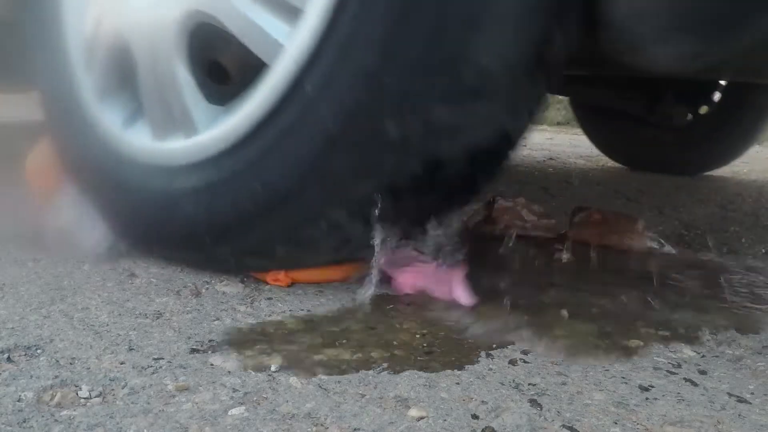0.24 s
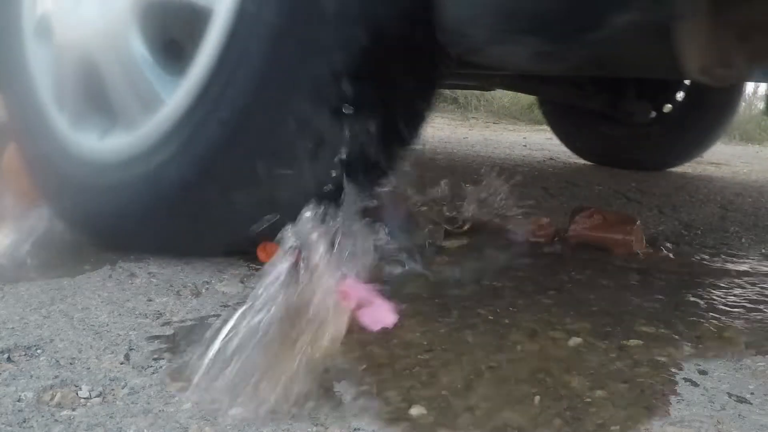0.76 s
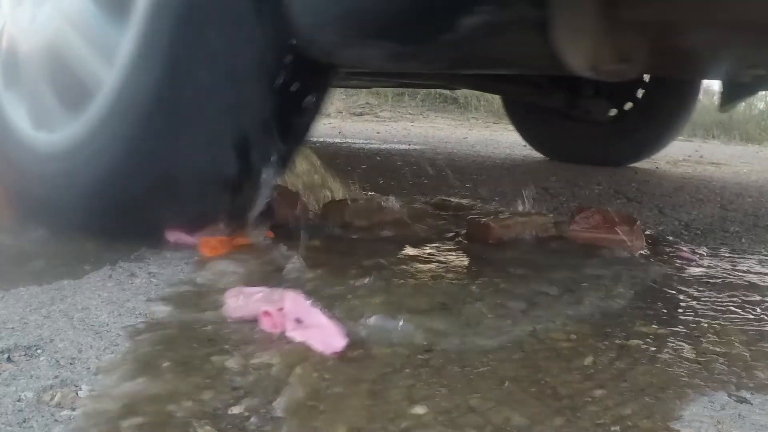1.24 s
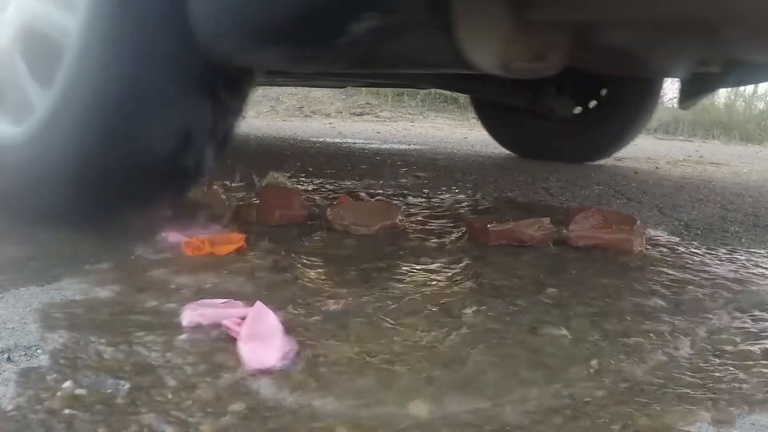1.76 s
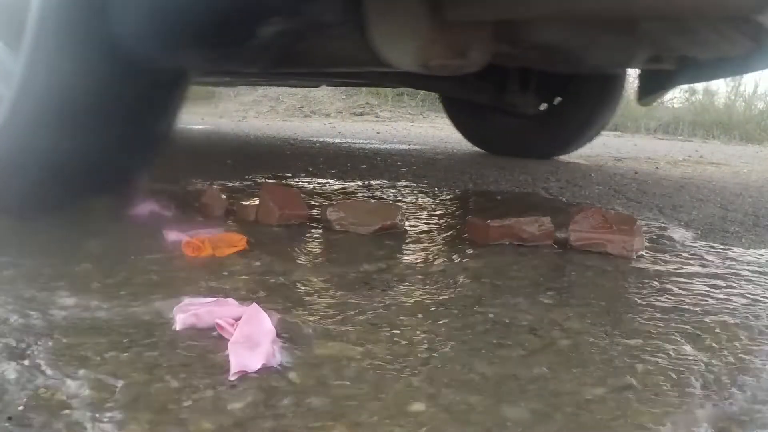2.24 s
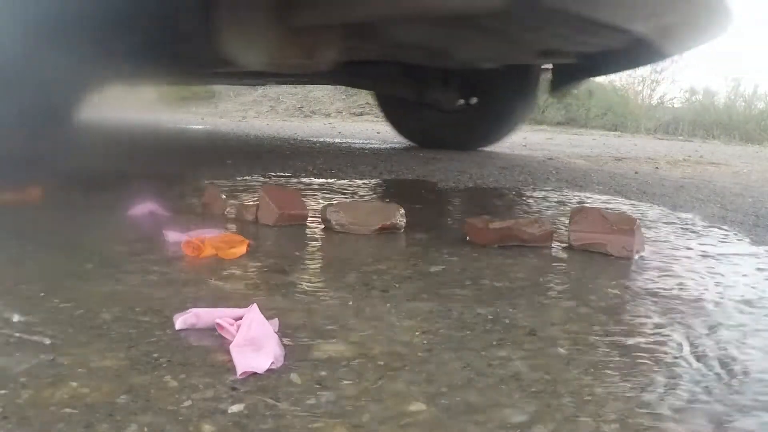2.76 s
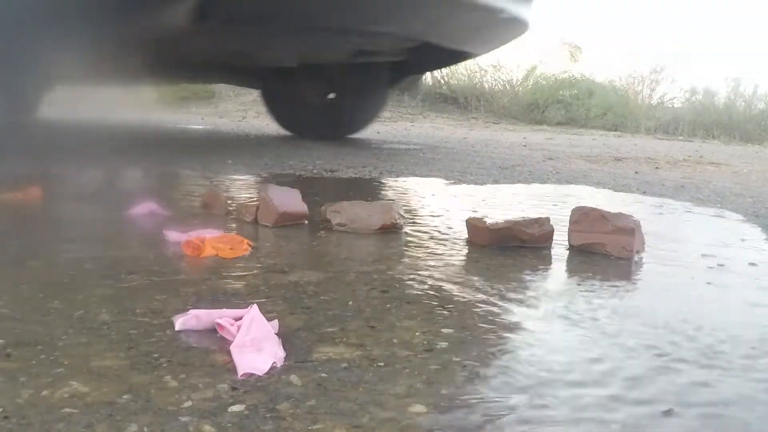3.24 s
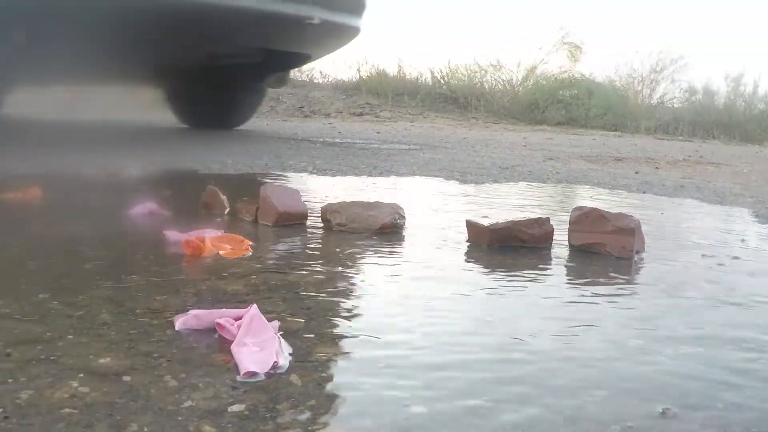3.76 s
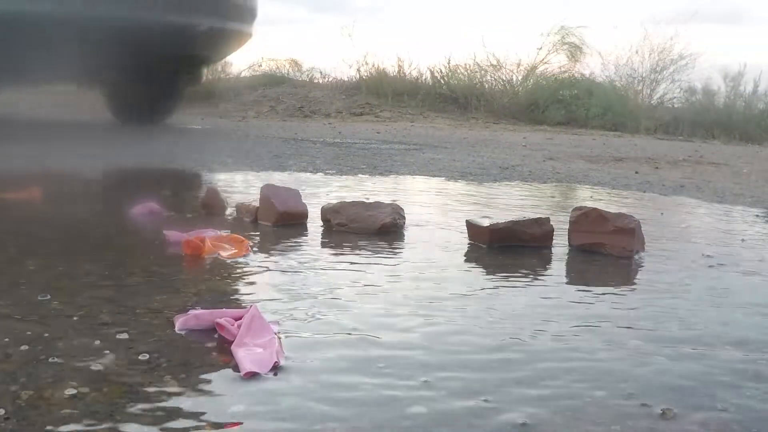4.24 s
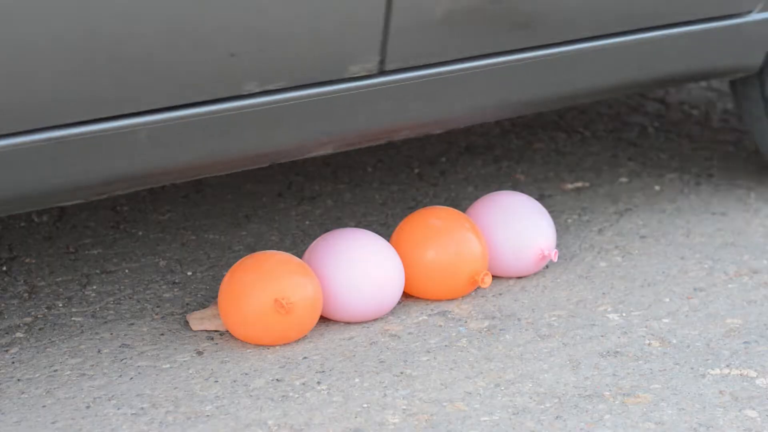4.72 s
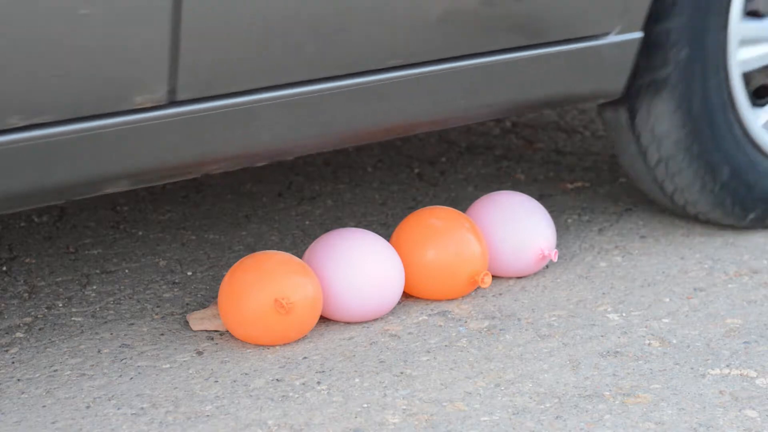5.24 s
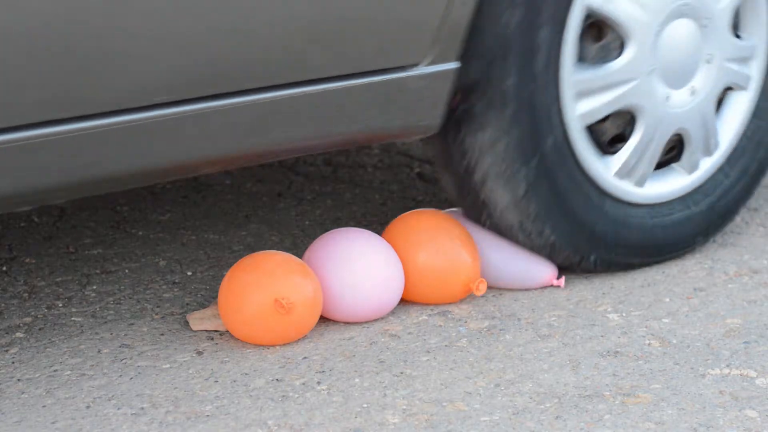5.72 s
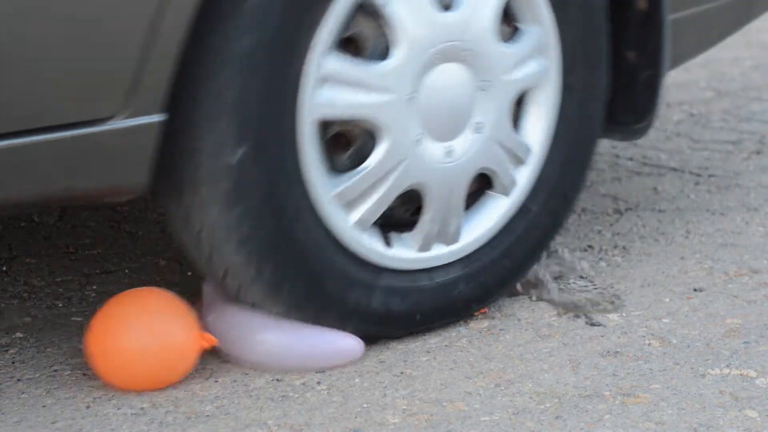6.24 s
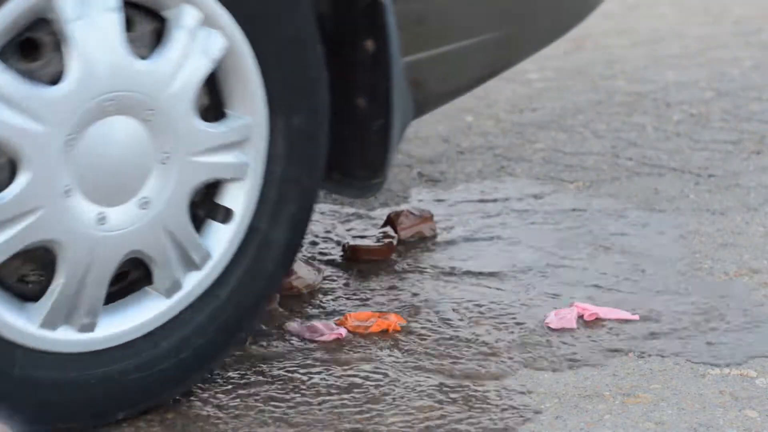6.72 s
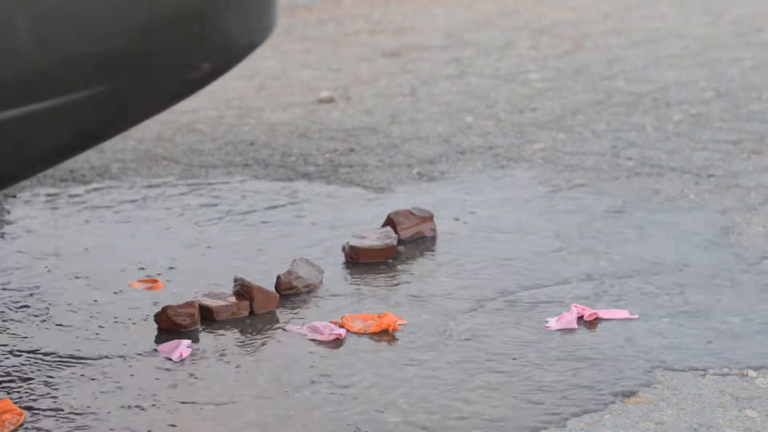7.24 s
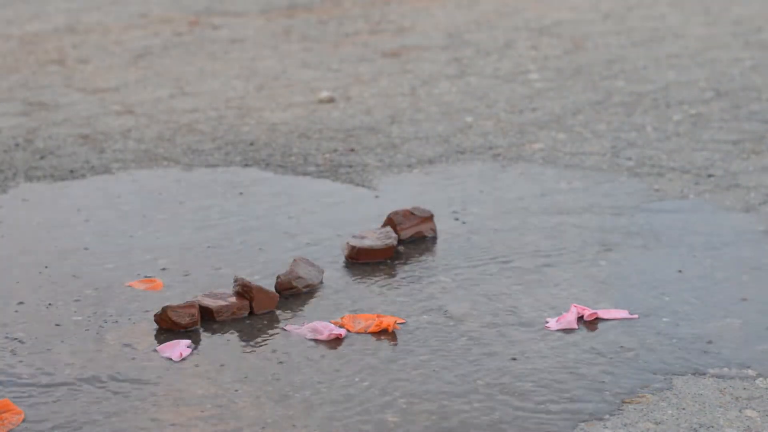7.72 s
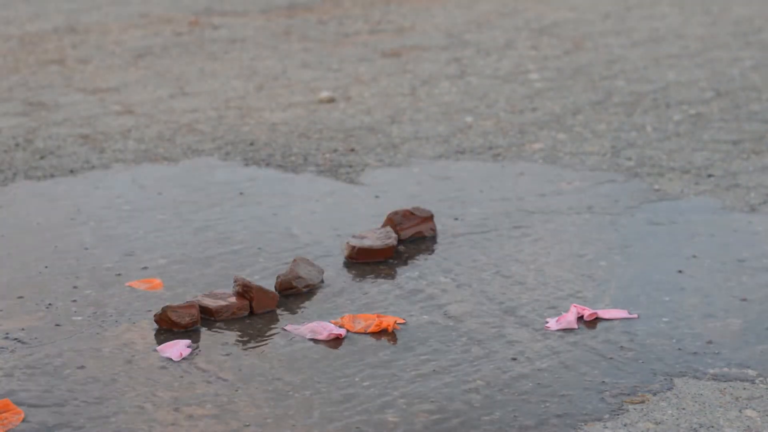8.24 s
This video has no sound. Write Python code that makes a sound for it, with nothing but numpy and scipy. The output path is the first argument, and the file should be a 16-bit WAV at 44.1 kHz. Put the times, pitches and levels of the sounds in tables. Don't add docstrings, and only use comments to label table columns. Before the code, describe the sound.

Three abrupt scenes, all close to the road in open air. Slow, dark engine thumps with dull watery explosions and a ringing camera case; then a thin, distant petrol engine easing away with faint drips; then a full, near engine with belt whine, hiss and gusts, loud overloaded balloon cracks, wet tyre spray and ticking drops, before the engine slows and recedes.

```python
import sys
import numpy as np
from scipy import signal
from scipy.fft import rfft, irfft, next_fast_len
from scipy.io import wavfile
from scipy.ndimage import uniform_filter1d

SR = 44100
rng = np.random.default_rng(int(sys.argv[2]) if len(sys.argv) > 2 else 0)


def undo_db(level):
    steps = np.asarray(level, float) / 20
    return 10 ** steps


def unload_wav(signal):
    wavfile.write(
        sys.argv[1],
        SR,
        np.round(np.clip(np.atleast_2d(signal).T, -1, 1) * 32767).astype(np.int16),
    )


N = 373527

VIEW_STARTS = (0, 2.6, 4.5585)
# t/s, f/Hz
FIRING_SLOW = [(0, 10.5), (2.6, 10.5)]
FIRING_FAR = [(2.6, 41.93), (3.55, 41.84), (3.75, 36.8), (4.266, 29.84), (4.55, 28.35)]
FIRING_NEAR = [(4.57, 42.43), (5.262, 41.47), (5.57, 42.3), (5.8, 41.97), (6.24, 42.57), (6.633, 42.21),
               (7.8, 41.4), (8.052, 35.56), (8.272, 31.14), (8.47, 30.3)]
# f/Hz, level/dB
PIPE_TONE_SLOW = [(3.5, -16), (6.0, 6), (22, 0.5), (38, -20.5), (55, -6.5), (71, -15), (103, -21.5),
                  (115, -15.5), (135, -40), (150, -21.5), (200, -42.5), (330, -120)]
PIPE_TONE_FAR = [(15, -49.5), (25, 6), (45, -0.5), (114, -17.5), (161, -14), (213, -12.5), (277, -21.5),
                 (357, -6.5), (382, 6), (492, -22), (600, -65), (780, -73), (1320, -120)]
PIPE_TONE_NEAR = [(15, -47.5), (25, -16.5), (54, -14), (86, -5), (145, -10.5), (168, -6.5), (194, -15),
                  (237, -16), (300, -14.5), (335, -5.5), (352, -10.5), (378, 6), (430, 2.5), (492, -15.5),
                  (600, -10), (780, -42), (1320, -120)]
PIPE_TONE_BEHIND = [(15, -50.5), (25, -10.5), (54, -11.5), (86, -6), (134, -19), (168, -10.5), (188, -17),
                    (213, -6.5), (253, -17.5), (301, -30.5), (325, -19.5), (352, -15.5), (425, 3.5),
                    (485, -15), (600, -25), (780, -37.5), (1320, -120)]
# f/Hz, level/dB per Hz
BAY_TONE_SLOW = [(76, -51.5), (130, -22), (229, -16), (438, -12), (519, -44.5), (581, -6.5), (728, -12.5),
                 (804, -8), (1050, -23.5), (1260, -20), (1430, -19), (3030, -28.5), (3800, -36),
                 (4940, -63), (8360, -120)]
BAY_TONE_FAR = [(260, -44), (450, -9.5), (693, -14.5), (1010, -12.5), (1340, -11), (1440, -7.5),
                (1670, -11.5), (1790, -6.5), (2100, -23), (2250, -11), (3280, -3.5), (4300, -16),
                (4900, -10), (7880, -16), (14000, -19.5)]
BAY_TONE_NEAR = [(150, -45), (250, -12.5), (302, -14.5), (427, -3), (482, -15.5), (680, -18), (838, -14),
                 (990, -20), (1120, -14), (1480, -15.5), (2710, -23.5), (3400, -25), (5230, -30),
                 (9410, -31), (15500, -50.5)]
# f/Hz, level/dB per Hz
WATER_TONE_SLOW = [(76, -40), (130, -31), (312, -20), (458, -5), (519, -26), (581, -8.5), (815, -7.5),
                   (993, -11.5), (1250, -6.5), (1450, -12.5), (2820, -16.5), (3800, -25), (4940, -41.5),
                   (8360, -120)]
WATER_TONE_FAR = [(470, -52.5), (800, -33), (1860, 1.5), (2110, -14), (2330, 3), (3320, 5), (4290, -2),
                  (4910, 4.5), (5830, -5), (15000, -31)]
WATER_TONE_NEAR = [(290, -40), (500, -12.5), (827, -9), (1100, -5), (1960, -8), (2260, -7.5), (3430, -4.5),
                   (4770, -4.5), (9370, 14.5), (15500, -0.5)]
# f/Hz, width/Hz, level/dB against the clatter
NARROW_NOTES_SLOW = [(443, 16, -4.5), (815, 77, 0), (1255, 50, -5.5)]
NARROW_NOTES_FAR = [(1750, 100, -16), (3270, 100, -12), (4870, 50, -12), (8540, 45, -14)]
NARROW_NOTES_NEAR = [(1139, 17, -12), (1490, 21, -18), (3323, 310, -12.5), (9700, 500, -17.5), (847, 32, -14.5),
                     (1274, 51, -17.5)]
# t/s, peak level/dB, treble against body level/dB, short note f/Hz, ring-out t60/s
BURSTS_SLOW = [(0.22, -14, -38, 234, 0.065), (0.4065, -7, 0.5, 844, 0.059), (0.43, -18, 1.5, 1200, 0.14),
               (0.478, -7, -13, 770, 0.042), (0.486, -0.5, -13, 800, 0.062), (0.501, -3, -16.5, 776, 0.073),
               (0.805, -24.5, -7.5, 894, 0.056), (0.812, -8, -8, 693, 0.06), (1.166, -14, -15, 1110, 0.033),
               (1.161, -6.5, -20, 990, 0.05), (2.3295, 11.5, -9, 798, 0.022), (2.338, -1, -20.5, 454, 0.12)]
BURSTS_FAR = [
    (2.6738, -34.5, -7, 3250, 0.039),
    (2.7038, -24.5, -23.5, 3350, 0.032),
]
BURSTS_NEAR = [
    (6.126, 4, -7.5, 9650, 0.044),
    (6.1325, -4.5, -1.5, 3254, 0.03),
    (6.3026, 1.5, 1.5, 9920, 0.05),
    (6.311, -8, -3.5, 9370, 0.08),
    (6.3246, -3, 4, 3634, 0.04),
    (6.318, -10, 2, 8000, 0.04),
    (6.4053, -5, 4, 8400, 0.016),
    (6.331, -13, 2, 9000, 0.05),
    (6.781, 5.5, 4.5, 8750, 0.025),
    (6.7874, -2, -10, 9950, 0.058),
]
# t/s, peak level/dB,
# short note f/Hz
WATER_SLAPS_SLOW = [(0.039, -31, 400), (0.156, -26, 408), (0.369, -22, 628), (0.422, -11, 800),
                    (0.439, -11, 860), (0.458, -9.5, 862), (0.514, -13, 830), (0.529, -15, 870),
                    (0.564, -25.5, 686), (0.635, -22, 666), (0.686, -23.5, 870), (0.697, -21.5, 1215),
                    (0.756, -37, 800), (0.851, -16.5, 1130), (0.876, -14, 820), (0.902, -16, 846),
                    (0.916, -22.5, 840), (0.935, -22.5, 827), (0.988, -26, 830), (1.013, -26, 1710),
                    (1.05, -26, 600), (1.057, -15, 733), (1.084, -21, 385), (1.11, -22, 810),
                    (1.204, -18, 437), (1.226, -25, 483), (1.239, -20, 710), (1.403, -26, 820),
                    (1.507, -25, 640), (1.639, -28, 740), (1.815, -26.5, 700), (2.018, -31, 748),
                    (2.54, -37, 1200)]
# t/s, peak level/dB, bubble f/Hz
KERB_DROPS = [(6.1215, -8, 9460), (6.1594, -11.5, 8200), (6.2218, -13.5, 7850), (6.3614, -20.5, 9600),
              (6.3764, -11, 10000), (6.4214, -9, 9500), (6.4334, -10, 5180), (6.4647, -39, 8580),
              (6.4931, -11, 4030), (6.5534, -13, 9700), (6.6508, -4, 7700), (6.9177, -13, 6100),
              (6.9264, -15.5, 9800), (6.9386, -10, 9600), (6.9474, -13, 9600), (7.0379, -6, 9000),
              (7.1414, -14, 9400), (7.2894, -18, 10070), (7.5911, -14.5, 9740), (7.9624, -18.5, 6070),
              (8.3255, -16.5, 3700)]
# t/s, peak level/dB, ring f/Hz
TYRE_GRIT = [
    (5.7679, -14, 1960),
    (7.8389, -18.5, 1680),
    (8.134, -19.5, 2520),
    (8.1644, -20.5, 1490),
]
# t/s, peak level/dB
CASE_DRIPS = [(2.6414, -46), (2.659, -38), (2.687, -30), (2.734, -41), (2.7644, -37.5), (3.0709, -49),
              (3.2176, -47), (3.5104, -46), (3.5904, -41.5), (3.8834, -40), (3.915, -43), (4.0554, -48)]
# f/Hz, level/dB, t60/s
CASE_NOTES = [(458, -9, .33), (587.5, -5, 0.18), (708, -10, .35), (823, -7.5, 0.18), (917, -6.5, 0.24),
              (1222, -7.5, .19)]
# t/s, peak level/dB, f/Hz, t60/s
STRUCK_NOTES = [
    (6.239, -24, 8000, .06),
    (6.466, -16, 1500, .06),
    (6.467, -18, 5200, .015),
    (6.434, -20, 5200, .015),
]
# t/s, loss with distance level/dB, engine load level/dB
DISTANCE_LOAD_SLOW = [(0, -2, 1), (.14, -5.5, 11), (.41, 0, 1.5), (.65, 3.5, -9), (1.05, -3.5, -7),
                      (1.36, -8.5, -1.5), (1.5, -5.5, 0.5), (1.9, -8, -0.5), (2.21, -15, -0.5),
                      (2.41, -12, 4), (2.6, -9.5, -4)]
DISTANCE_LOAD_FAR = [(2.6, 1.5, 0), (2.72, 0, -2), (2.85, -3.5, 1.5), (3.66, -5.5, -2), (3.98, -7.5, -15),
                     (4.55, -10, -8.5)]
DISTANCE_LOAD_NEAR = [(4.56, 1, 3.5), (4.8, -0.5, 0.5), (5.2, 0, 1), (5.62, 0.5, -3.5), (6.09, 0.5, 0),
                      (6.42, -0.5, -2), (6.62, -0.5, -2), (7.1, -1, 3), (7.46, -2, -3), (7.76, -2.5, 5),
                      (8.0, -4, 0), (8.3, -9, 7), (8.47, -7, -18)]
# level/dB at the closest point, share of distance loss, share of load
CAR_LEVELS_SLOW = [
    (-34, 0.44, .1),
    (-39.5, 1, 0.89),
    (-34, 0.86, 0.0088),
    (-52, 0.81, .1),
]
CAR_LEVELS_FAR = [
    (-50.5, 0.73, 0.34),
    (-59, .8, .99),
    (-54.5, 1, .01),
    (-67.5, 0.43, .01),
]
CAR_LEVELS_NEAR = [
    (-32, 0.17, .1),
    (-25.5, 1.06, 1),
    (-25, 0.68, 0.062),
    (-29.5, 1.41, 0.0093),
]
# t/s, level/dB over the calm, half length t/s
WIND_SLOW = [
    (0.102, 20, 0.18),
    (.75, 13, .2),
    (1.33, 11.5, .1),
    (1.8, 8, 0.14),
    (2.126, 13, 0.21),
]
WIND_FAR = [
    (2.724, 5.002, 0.061),
    (4.2, 6, .6),
]
WIND_NEAR = [
    (5.1, 11, 0.065),
    (5.29, 17, 0.16),
    (5.45, 8.6, 0.079),
    (6.42, 5.8, 0.16),
    (6.62, 14, 0.2),
    (7.76, 4.3, 0.073),
    (8.16, 11, 0.073),
    (8.38, 9.1, 0.079),
]
TAILPIPE_TURN = (6.2, 6.4)
# scene change, full, turns away, gone t/s
CAR_FRONT_FACING = (4.55, 4.56, 5.0, 5.3)
SPRAY_S, SPRAY_DB = (6.1, 6.4, 6.72, 7.2), 1
WHINE_FADE_S, WHINE_FADE_DB = (5.38, 6.2), -6
DUCK_DB, DUCK_RECOVERY_S = -11.5, 0.043
FLOOR_T60_S, FLOOR_DB, FLOOR_DAMP_HZ = .085, -16, 9000
SHELL_HZ, SHELL_FACING_DB = 1492, 5.5
PIPE_SHADED, SHADED_HZ = 0.9, 382
AIR_HZ, AIR_SHARE = 11000, 0.41


def level(x, db):
    return x * undo_db(db) / np.sqrt(np.mean(x ** 2) + 1e-18)


def colour(x, points, size=16384):
    hz, db = np.transpose(points)
    grid_hz = np.arange(size // 2 + 1) * SR / size + 1
    log_gain = np.interp(np.log(grid_hz), np.log(hz), db) * np.log(10) / 20
    fold = np.r_[1, 2 * np.ones(size // 2 - 1), 1, np.zeros(size // 2 - 1)]
    response = irfft(np.exp(rfft(irfft(log_gain) * fold)))
    return signal.fftconvolve(x, response)[:len(x)]


def halves(x, hz, order=12):
    size = next_fast_len(len(x) + SR // 4)
    grid_hz = np.arange(size // 2 + 1) * SR / size
    low = irfft(rfft(x, size) / (1 + (grid_hz / hz) ** order), size)[:len(x)]
    return low, x - low


def ring(x, hz, width):
    return signal.lfilter(*signal.iirpeak(hz, hz / width, fs=SR), x)


def walk(n, rate):
    k = int(SR / rate)
    steps = np.repeat(rng.standard_normal(n // k + 1), k)
    return 1.3 * uniform_filter1d(uniform_filter1d(steps, k), k)[:n]


def wind_rumble(n, pipe, slow, gusty_db):
    buffets = rng.standard_normal(n) * undo_db(gusty_db * walk(n, 25 / slow))
    return halves(colour(buffets, pipe), 260 / slow, order=4)[0]


def engine_bay(phase, fade_db, points, whines, slow, grit_db, beat, flicker_db, split_hz):
    n = len(phase)
    hits = rng.random(n) < 900 / slow / SR
    grains = hits * undo_db(4.0 * np.minimum(rng.exponential(size=n), 4))
    grains = signal.lfilter([1], [1, -np.exp(-1 / (0.0014 * slow * SR))], grains)
    crackle = grains * rng.standard_normal(n)
    clatter = rng.standard_normal(n) * (1 + beat * np.cos(2 * np.pi * phase))
    out = level(colour(clatter + level(crackle, grit_db), points), 0)
    for hz, width, db in whines:
        whine = ring(rng.standard_normal(n), hz, width) * undo_db(1.4 * walk(n, 4 / slow))
        out = out + level(whine, db) * undo_db(fade_db * (hz < split_hz))
    return [level(part * undo_db(flicker_db * walk(n, 60 / slow)), 0) for part in halves(out, split_hz, order=4)]


def exhaust(hz, pipe, past, facing, slow, wind_db, weak_db, scatter_db, puff_db, silencer_hz, width, gusty_db,
            shell_db):
    n = len(hz)
    phase = np.cumsum(hz * (1 + .0015 * walk(n, 12 / slow))) / SR
    firing = phase.astype(int)
    size_db = weak_db * (firing % 2) + scatter_db * rng.standard_normal(N // 100)[firing]
    pulses = np.diff(firing, prepend=0) * undo_db(size_db)
    thumps = (1 - past) * colour(pulses, pipe) + past * colour(pulses, PIPE_TONE_BEHIND)
    low, boom = halves(thumps, 290 / slow)
    boom = boom - PIPE_SHADED * facing * ring(boom, SHADED_HZ, 24)
    sweep = (np.arange(n // 2 + 1) * SR / n * slow) ** 2 * .02 / 300
    low = irfft(rfft(low) * np.exp(-1j * np.pi * sweep), n)
    puffs = np.exp(-(phase / 2 % 1) / 0.45) * rng.standard_normal(n)
    blown = level(ring(ring(puffs, silencer_hz, width), silencer_hz, width), puff_db)
    shell = level(ring(puffs, SHELL_HZ / slow, 16 / slow), shell_db)
    shell = shell * (1 - .5 * past) * undo_db(SHELL_FACING_DB * facing)
    gust = undo_db(wind_db)
    low = (level(low, 0) + gust * level(wind_rumble(n, pipe, slow, gusty_db), 0)) / np.sqrt(1 + gust ** 2)
    return low, level(level(boom, 0) + blown, 0) + shell, phase


def struck_notes(table, t):
    out = 0
    for s, db, hz, t60 in table:
        fade = (t > s) * np.exp(-np.log(1000) * np.abs(t - s) / t60)
        out = out + undo_db(db) * fade * np.sin(2 * np.pi * hz * (t - s))
    return out


def case_ringing(water):
    return sum(undo_db(db + 1) * ring(water, hz, 2.0 / t60) for hz, db, t60 in CASE_NOTES)


def under_car_echo(dry, slow):
    t = np.arange(SR // 2) / SR
    tail = rng.standard_normal(len(t)) * np.exp(-np.log(1000) * t / (FLOOR_T60_S * slow))
    tail = halves(tail, FLOOR_DAMP_HZ / slow, order=2)[0]
    return undo_db(FLOOR_DB) * signal.fftconvolve(dry, tail / np.linalg.norm(tail))[:len(dry)]


def alike(rows, top_db, t60):
    return [(s, db, top_db, hz, t60) for s, db, hz in rows]


def water_bursts(table, start, n, points, slow, split_hz, bubble_db, cycles, crack, attack_s):
    body, top, bubbles = np.zeros((3, n + SR))
    t = np.arange(SR // 2) / SR
    for s, db, top_db, hz, t60 in table:
        here = slice(int((s - start) * SR), int((s - start) * SR) + len(t))
        fade = np.exp(-np.log(1000) * (t / np.clip(t60, .002, .5)) ** 1.236)
        fade = fade + crack * np.exp(-t / (0.0011 * slow))
        fade = fade * np.minimum(t / attack_s * max(undo_db(db), 1) ** 2, 1)
        note = np.exp(-t * hz / cycles) * np.sin(2 * np.pi * hz * t)
        body[here] += undo_db(db) * fade
        top[here] += undo_db(db + top_db) * fade ** 1.4
        bubbles[here] += undo_db(db + bubble_db) * fade * note
    spray = rng.standard_normal(n) * undo_db(2.0 * walk(n, 1500 / slow))
    scale = [np.std(part) * 3.71 for part in halves(colour(spray, points), split_hz, order=4)]
    low = halves(colour(spray * body[:n], points), split_hz, order=4)[0] / scale[0]
    high = halves(colour(spray * top[:n], points), split_hz, order=4)[1] / scale[1]
    splash = bubbles[:n] + low + high
    return splash + under_car_echo(splash, slow)


def treble_edge(sound, water, slow):
    steep = signal.ellip(10, .1, 50, 15450 / slow, fs=SR, output="sos")
    heard = signal.sosfiltfilt(steep, sound)
    past_edge = halves(water, 16400 / slow)[1]
    strength = uniform_filter1d(past_edge ** 2, size=200) / np.mean(past_edge ** 2)
    return heard + undo_db(-12) * past_edge * np.minimum(strength / 3, 1) ** 2


def view(start, end, fire, drive, layers, gusts, calm_db, ducks, slow, pipe, firing, clatter, bursts):
    t = np.arange(int(start * SR), min(int(end * SR), N)) / SR
    hz = np.interp(t, *np.transpose(fire))
    s, loss, load = np.transpose(drive)
    duck_db = sum(DUCK_DB * np.exp(-np.abs(t - at) / DUCK_RECOVERY_S) * (t > at) for at in ducks)
    low_db, boom_db, clatter_db, hiss_db = (db + np.interp(t, s, far * loss + hard * load) + duck_db
                                            for db, far, hard in layers)
    hiss_db = hiss_db + SPRAY_DB * np.interp(t, SPRAY_S, (0, 1, 1, 0))
    wind_db = calm_db + sum(db * np.maximum(1 - np.abs(t - at) / half, 0) for at, db, half in gusts)
    past = np.interp(t, TAILPIPE_TURN, (0, 1))
    facing = np.interp(t, CAR_FRONT_FACING, (0, 1, 1, 0))
    low, boom, phase = exhaust(hz, pipe, past, facing, slow, wind_db, **firing)
    fade_db = np.interp(t, WHINE_FADE_S, (0, WHINE_FADE_DB))
    mid, hiss = engine_bay(phase, fade_db, slow=slow, **clatter)
    hiss, air = halves(hiss, AIR_HZ, order=4)
    hiss = hiss + air * undo_db(AIR_SHARE * np.interp(t, s, loss) - 0.5)
    low = low * np.sqrt(1 + undo_db(wind_db) ** 2)
    engine = undo_db(low_db) * low + undo_db(boom_db) * boom + undo_db(clatter_db) * mid + undo_db(hiss_db) * hiss
    water = water_bursts(start=start, n=len(t), slow=slow, **bursts)
    if slow > 1:
        water = water + case_ringing(water)
    return treble_edge(engine + water + struck_notes(STRUCK_NOTES, t), water, slow)


def scene():
    slaps = alike(WATER_SLAPS_SLOW, -18, 0.11)
    slowed = view(
        VIEW_STARTS[0], VIEW_STARTS[1], FIRING_SLOW, DISTANCE_LOAD_SLOW, CAR_LEVELS_SLOW, WIND_SLOW,
        calm_db=-13.0, ducks=[], slow=4, pipe=PIPE_TONE_SLOW,
        firing=dict(weak_db=1.5, scatter_db=4.5, puff_db=2.0, silencer_hz=104, width=24, gusty_db=-2.5,
                    shell_db=-17.0),
        clatter=dict(points=BAY_TONE_SLOW, whines=NARROW_NOTES_SLOW, grit_db=2.0, beat=0.18, flicker_db=-2.5,
                     split_hz=1600),
        bursts=dict(table=BURSTS_SLOW + slaps, points=WATER_TONE_SLOW, split_hz=1180, bubble_db=-5.5,
                    cycles=18, crack=0.46, attack_s=0.0046))
    drips = alike([(s, db, 3370) for s, db in CASE_DRIPS], -12, 0.048)
    far = view(
        VIEW_STARTS[1], VIEW_STARTS[2], FIRING_FAR, DISTANCE_LOAD_FAR, CAR_LEVELS_FAR, WIND_FAR,
        calm_db=-2.5, ducks=[], slow=0.98, pipe=PIPE_TONE_FAR,
        firing=dict(weak_db=-1.5, scatter_db=.5, puff_db=-5, silencer_hz=385, width=40, gusty_db=.6,
                    shell_db=-30),
        clatter=dict(points=BAY_TONE_FAR, whines=NARROW_NOTES_FAR, grit_db=-8, beat=.15, flicker_db=.8,
                     split_hz=4200),
        bursts=dict(table=BURSTS_FAR + drips, points=WATER_TONE_FAR, split_hz=4300, bubble_db=-9,
                    cycles=10.2, crack=0.37, attack_s=0.00063))
    small = alike(TYRE_GRIT, -12, 0.1) + alike(KERB_DROPS, -2, 0.018)
    near = view(
        VIEW_STARTS[2], N / SR + 1, FIRING_NEAR, DISTANCE_LOAD_NEAR, CAR_LEVELS_NEAR, WIND_NEAR,
        calm_db=-7.5, ducks=[BURSTS_NEAR[-1][0]], slow=0.98, pipe=PIPE_TONE_NEAR,
        firing=dict(weak_db=-5, scatter_db=.6, puff_db=.5, silencer_hz=438, width=17, gusty_db=2.2,
                    shell_db=-14),
        clatter=dict(points=BAY_TONE_NEAR, whines=NARROW_NOTES_NEAR, grit_db=-12, beat=.12, flicker_db=.6,
                     split_hz=4000),
        bursts=dict(table=BURSTS_NEAR + small, points=WATER_TONE_NEAR, split_hz=4430, bubble_db=-5,
                    cycles=6, crack=0.63, attack_s=.0008))
    return np.concatenate([slowed, far, near])[None, :N]


def band_limit(x):
    return signal.sosfilt(signal.butter(12, 15680, fs=SR, output="sos"), x)


def record(dry):
    mix = np.clip(dry, -1, 1)
    return band_limit(mix)


dry = scene()
out = record(dry)
unload_wav(out)
```